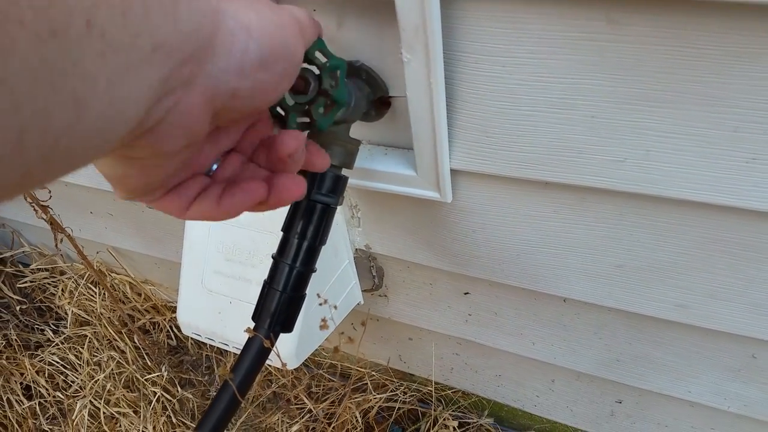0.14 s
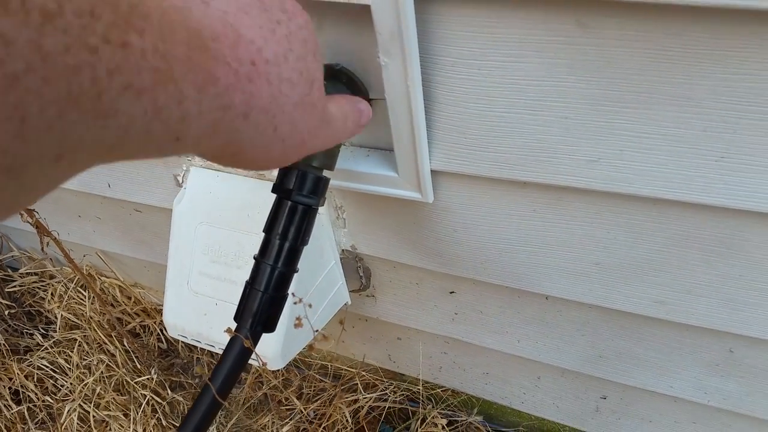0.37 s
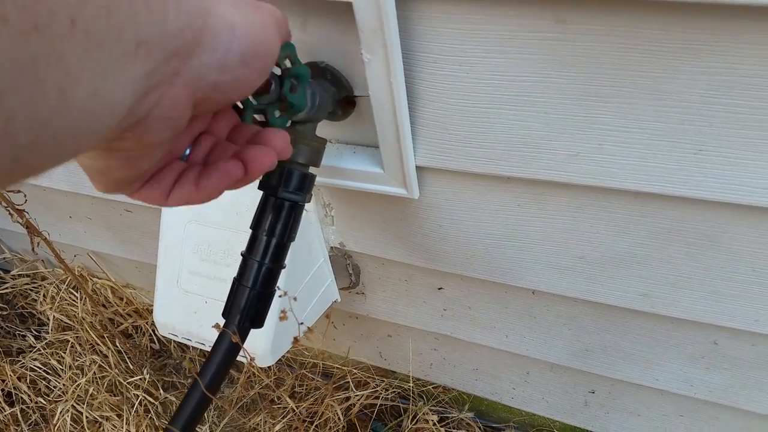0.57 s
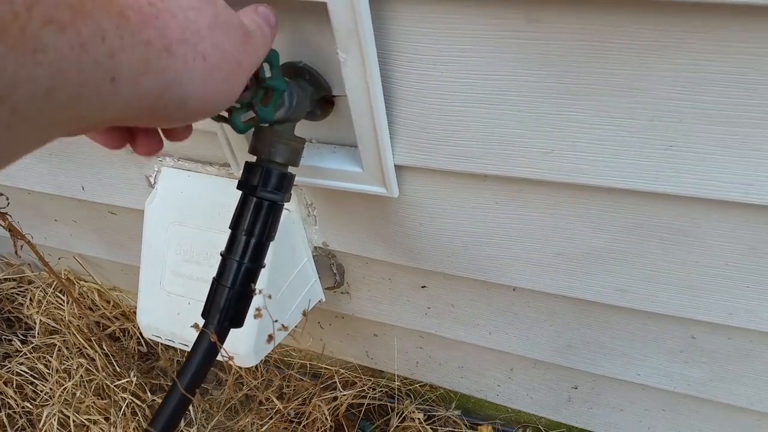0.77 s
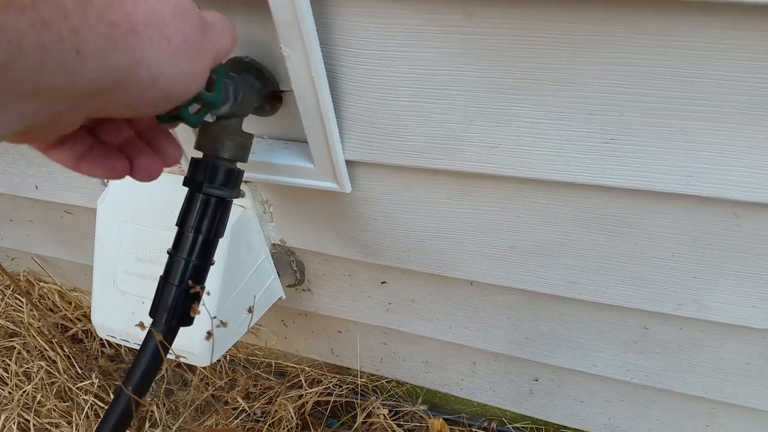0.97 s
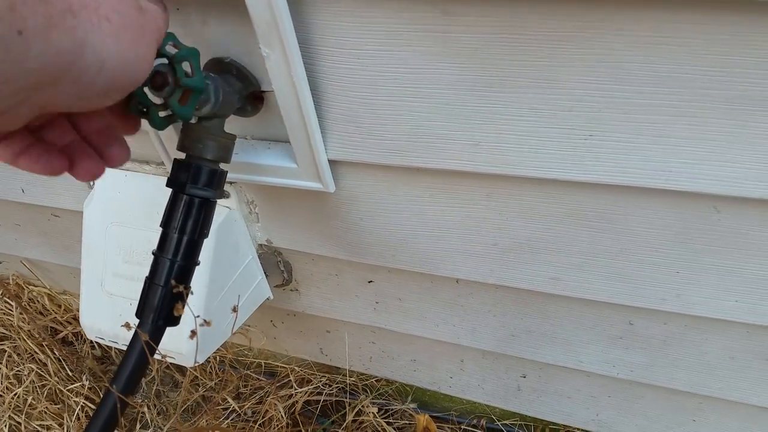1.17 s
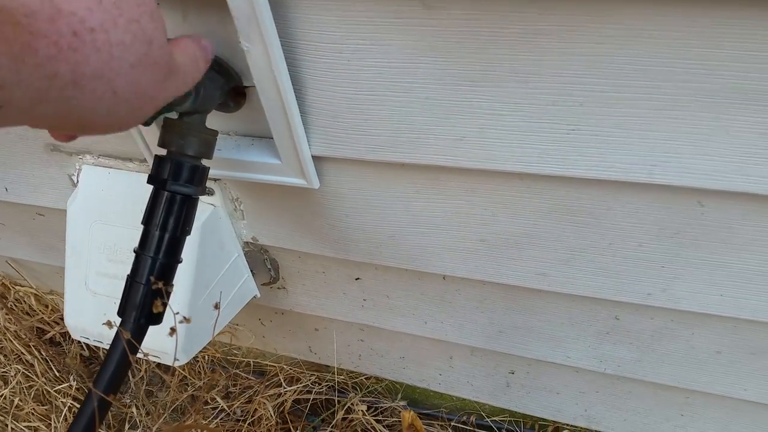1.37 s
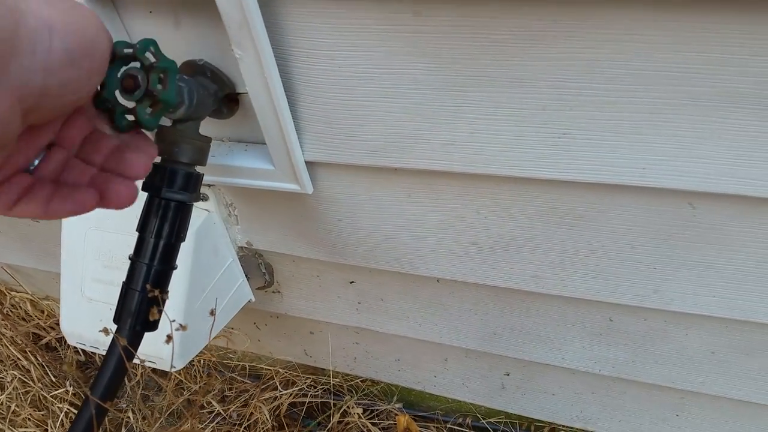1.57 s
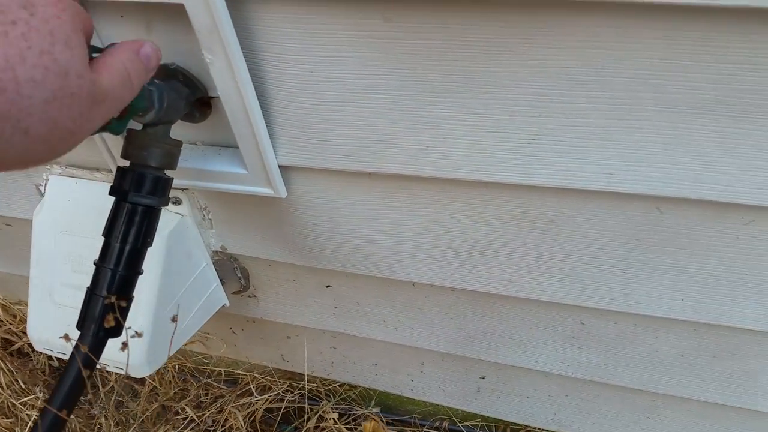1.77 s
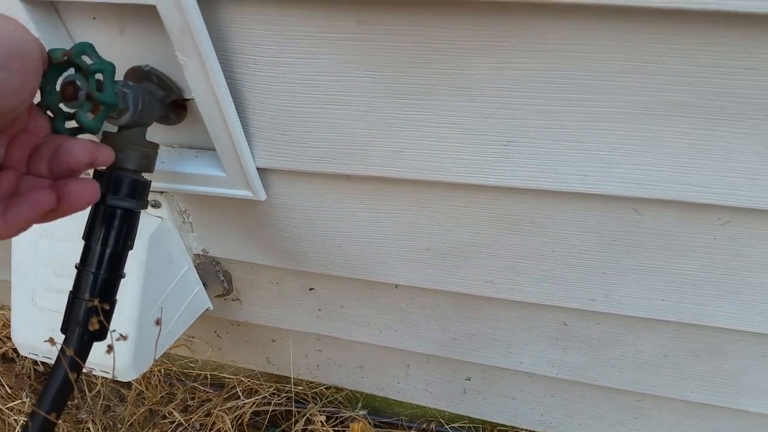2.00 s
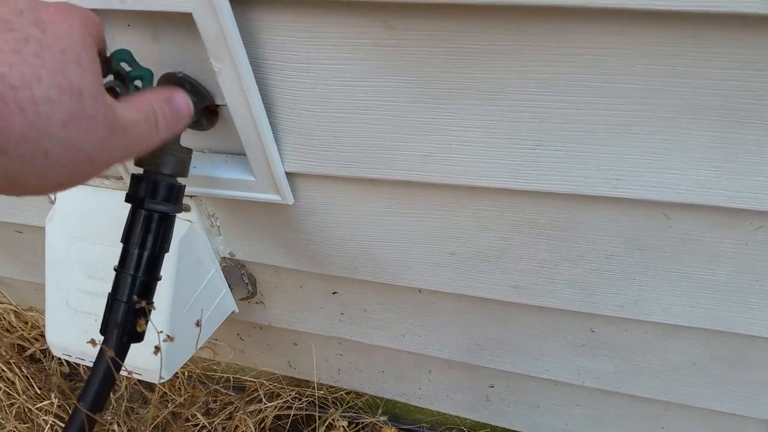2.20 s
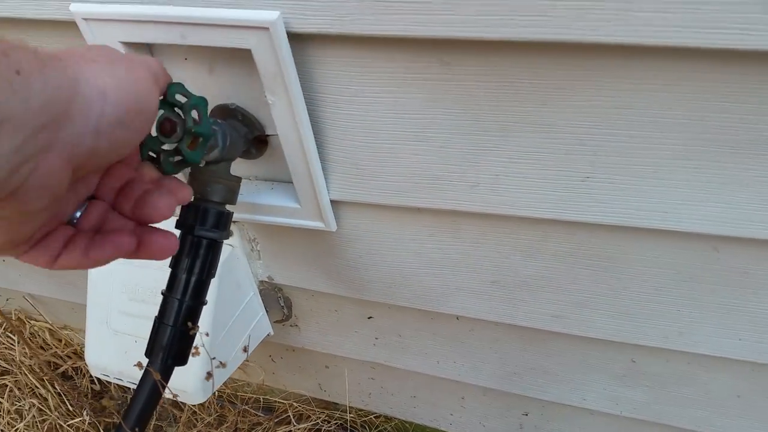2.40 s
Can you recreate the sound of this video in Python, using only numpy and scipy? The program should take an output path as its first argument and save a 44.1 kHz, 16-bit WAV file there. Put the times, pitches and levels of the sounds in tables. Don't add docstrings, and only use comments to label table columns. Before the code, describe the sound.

Dry metal tap wheel squeaking in brief high chirps, with soft grip thumps, close up outdoors

```python
import sys
import numpy as np
from scipy import signal
from scipy.fft import rfft, irfft, next_fast_len
from scipy.io import wavfile
from scipy.ndimage import map_coordinates

SR = 44100
rng = np.random.default_rng(int(sys.argv[2]) if len(sys.argv) > 2 else 0)


def makeup_ratio(level_db):
    decades = np.asarray(level_db, float) / 20
    return 10 ** decades


def wav_record(signal):
    frames = np.transpose(np.atleast_2d(signal))
    bounded = np.clip(frames, -1, 1)
    quanta = np.round(bounded * 32767).astype(np.int16)
    wavfile.write(sys.argv[1], SR, quanta)


N = 108045
T = np.arange(N) / SR

# start in seconds, hold in seconds, level in dB, pitch in Hz,
# second overtone relative to the bite in dB.
RING_SLIPS = [(.205, .005, -48, 4157, -45), (0.212, 0.016, -38, 4148, -17.5),
              (.227, 0.0082, -40.5, 4152, -33), (0.251, 0.014, -58.5, 4170, -38.5),
              (0.286, 0.0084, -45.5, 4175, -19), (0.301, 0.0118, -56.5, 4215, -44),
              (0.667, 0.012, -52, 4040, -15), (0.695, .009, -61.5, 4194, -40),
              (0.745, 0.0038, -40, 4277, -38.5), (0.768, 0.027, -55, 4160, -42),
              (0.811, 0.0097, -49, 4170, -43), (1.143, 0.023, -39.5, 4158, -21),
              (1.172, 0.027, -33, 4101, -14), (1.212, 0.0068, -49.5, 4150, -4.5),
              (1.22, 0.014, -40.5, 4090, -42), (1.244, 0.012, -48, 4060, -7),
              (1.26, 0.008, -45.5, 4080, -16), (1.615, 0.0096, -37.5, 4033, -24.5),
              (1.629, 0.0101, -43.5, 4047, -37), (1.656, .006, -46.5, 4180, -26),
              (1.665, 0.0231, -54, 4183, -29.5), (2.084, 0.014, -34.5, 4161, -5.5),
              (2.127, 0.0084, -43.5, 4106, -11.5), (2.142, 0.013, -44, 4070, -17.5)]
# from when in seconds, left-right dB of the ring,
# left-right dB of the second overtone, third overtone relative to the second in dB, left lead in radians.
HAND_TURNS = [
    (0, -16.5, -10, -13, 1.7),
    (.27, -2, -6, 4, 1.5),
    (.6, -12, -9, -12, 1.56),
    (1.1, -10, -3, -8, -2),
    (1.5, -9.5, -4, -11, -2),
    (2, -9.5, -11, -11, 2),
]
# time in seconds, pitch in Hz, level in dB.
CHIRP_GLIDES = [
    [(.26, 2598, -69), (.267, 2470, -48), (.273, 2215, -38), (.283, 2200, -40.5), (.293, 2124, -45.5),
     (.303, 2054, -54), (.313, 2026, -57), (.322, 2135, -77.5)],
    [(.722, 2946, -72.5), (.728, 2817, -57), (.734, 2532, -45.5), (.742, 2209, -39), (.753, 2200, -40.5),
     (.772, 2930, -45.5), (.785, 3120, -48), (.797, 3165, -58), (.81, 3163, -76)],
    [(2.129, 2224, -54.5), (2.138, 2103, -41), (2.146, 2015, -42.5), (2.154, 2184, -46.5),
     (2.17, 2183, -74)],
    [(.75, 2200, -49), (.759, 1940, -50), (.768, 1980, -60)],
]
# time in seconds, pitch in Hz, level in dB.
LEAD_IN_CHIRP = [(2.06, 2890, -77), (2.076, 2430, -60.5), (2.087, 2410, -65)]
CHIRP_HARMONICS_DB = [1.5, -11.5, -14.5, -31, -24, -27, -37]
CHIRP_HARSHNESS_DB = [2.5, 4, 8.5, -21]
# time in seconds, pitch in Hz, level in dB.
FAINT_LINES = [
    [(.764, 7200, -76), (.778, 7200, -64), (.793, 7320, -70.5)],
    [(.668, 3230, -72), (.679, 3110, -66), (.692, 3000, -63)],
    [(1.62, 3366, -70), (1.632, 3369, -57), (1.641, 3380, -51)],
]
# time in seconds, pitch in Hz, level in dB.
GROAN_GLIDE = [(1.624, 708.3, -58), (1.633, 706.4, -43), (1.641, 683.7, -29.5), (1.649, 635, -28),
               (1.657, 644, -32.5), (1.666, 633, -36.5), (1.675, 638, -57), (1.685, 620, -51.5),
               (1.705, 610, -47)]
GROAN_HARMONICS_DB = [1.5, -10, -19.5, -19.5, -16]
# frequency in Hz, density in dB per Hz.
GRIT_COLOUR = [(500, -55), (1200, -1), (3300, 1), (5000, -8), (6700, -4), (7900, -21), (15500, -41)]
# frequency in Hz, left-right difference in dB, left lead in radians.
PORT_DIFFERENCE = [(150, 1, 0.05), (650, 0.5, 0.85), (1400, -4, 1.8), (2200, 3.5, 1.4), (3220, -2, 2),
                   (4170, -8.5, 1.6), (5900, -20, 1.7), (10200, -3, 1.5)]
# start in seconds, length in seconds, level in dB.
HAND_CREAKS = [(0.197, 0.098, -54), (0.322, 0.0375, -50), (0.387, 0.095, -50.5), (0.518, 0.031, -57),
               (0.667, 0.13, -53), (0.883, 0.022, -54.5), (1.128, 0.068, -57), (1.199, 0.052, -51.5),
               (1.316, 0.028, -60), (1.437, 0.07, -64), (1.62, 0.064, -50.5), (1.662, 0.073, -50),
               (2.041, 0.11, -55.5), (2.12, 0.037, -44.5), (2.27, 0.011, -59)]
# frequency in Hz, density in dB per Hz.
CREAK_COLOUR = [(100, -39), (200, 4.5), (450, -3.5), (750, -2), (1300, -19.5), (2500, -25), (7000, -35),
                (12000, -47)]
# deepest swing in seconds, peak in dB, pitch in Hz.
REGRIP_THUMPS = [(0.316, -35.5, 256), (.334, -32, 230), (.349, -40, 217), (.387, -32.5, 440),
                 (0.394, -34, 500), (.404, -44, 228), (0.434, -38, 268), (.445, -33, 304), (.451, -32, 510),
                 (0.458, -42, 418), (0.523, -41.5, 190), (0.532, -40.5, 185), (.541, -37.5, 150),
                 (0.557, -42, 169), (.592, -39, 205), (0.757, -38.5, 144), (0.779, -38.5, 198),
                 (.889, -39, 348), (.897, -34, 569), (1.113, -37.5, 154), (1.169, -38.5, 250),
                 (1.187, -40.5, 278), (1.2, -33, 297), (1.207, -35.5, 231), (1.216, -37, 221),
                 (1.242, -39, 204.4), (1.444, -34.5, 245), (1.453, -34, 175), (1.493, -48.5, 245),
                 (1.503, -38.5, 210), (1.519, -36.5, 135), (1.607, -36.5, 225), (1.63, -35, 250.5),
                 (1.673, -33.5, 155), (1.687, -28, 290), (1.694, -28.5, 339), (1.703, -37, 202.5),
                 (1.712, -33, 246), (1.718, -29, 190), (1.734, -35.5, 185), (1.754, -39, 190),
                 (1.899, -41, 215), (1.906, -36, 215), (2.108, -38, 145), (2.125, -29, 290),
                 (2.134, -42, 240), (2.151, -27, 300), (2.169, -36, 129.3), (2.278, -42.5, 256.5),
                 (2.366, -43, 200)]
# start in seconds, level in dB, pitch in Hz, decay in cycles.
FINGER_TICKS = [(.06, -57, 6030, 8.6), (.469, -56.5, 2036, 15), (.484, -48, 1170, 4),
                (.492, -49, 1180, 4.9), (.536, -56, 7000, 4.5), (.575, -48, 6500, 5),
                (0.615, -45, 4430, 6.9), (1.54, -63, 5800, 18), (1.7, -51, 5400, 5.2),
                (1.714, -57, 4730, 5.9), (1.727, -68, 4600, 4), (1.739, -68, 6620, 40),
                (1.751, -40.5, 970, 2.5), (2.272, -50, 793, 2.02)]
# start in seconds, length in seconds, level in dB.
SKIN_RUBS = [
    (0, 0.031, -63),
    (0.334, 0.2, -72.5),
    (0.512, 0.11, -61),
    (0.616, 0.049, -65.5),
    (0.935, 0.11, -72.5),
    (1.54, 0.018, -68),
    (2.353, 0.035, -70.5),
]
# frequency in Hz, density in dB per Hz.
RUB_COLOUR = [(900, -22), (2000, -4), (6500, -3), (8400, -12), (15600, -8.5)]
# frequency in Hz, density in dB per Hz.
TRAFFIC_COLOUR = [(20, -29), (42, -19), (55, 2), (130, -1), (260, -6), (400, -14.5), (520, -57.5),
                  (900, -97)]
# frequency in Hz, density in dB per Hz.
AIR_COLOUR = [(250, -25.5), (480, -7.5), (900, -10.5), (2000, -19), (4000, -24), (8000, -28.5),
              (12000, -25.5), (15700, -27.5)]
# frequency in Hz, left-right likeness from 0 to 1.
PORT_LIKENESS = [(100, 0.97), (290, .92), (640, 0.36), (1400, 0)]


def unit(x):
    return x / np.sqrt(np.mean(x ** 2) + 1e-20)


def along(points, hz, column=1):
    p = np.transpose(points)
    return np.interp(np.log(hz + 1), np.log(p[0] + 1), p[column])


def wobble(rate, t=T):
    knots = rng.standard_normal(int(N * rate / SR) + 4)
    return map_coordinates(knots, [t * rate])


def filtered(x, response):
    m = next_fast_len(N + 8192)
    return irfft(rfft(x, m) * response(np.fft.rfftfreq(m, 1 / SR)), m)[..., :N]


def noise(spectrum, channels=1):
    white = rng.standard_normal((channels, N))
    return unit(filtered(white, lambda hz: makeup_ratio(along(spectrum, hz))))


def swell(t, s, hold, rise_db_s, t60):
    rise = rise_db_s * (t - s)
    fall = -60 * (t - s - hold) / t60
    return np.minimum(0, np.minimum(rise, fall))


def split(side_db, lead):
    ratio = makeup_ratio(side_db) * np.exp(1j * lead)
    return np.array([2 * ratio / (1 + ratio), 2 / (1 + ratio)])


def ports(x):
    return filtered(x, lambda hz: split(along(PORT_DIFFERENCE, hz), along(PORT_DIFFERENCE, hz, column=2)))


def ring():
    rise_db_s, build_db_s = 3397, 68
    wheel_t60_s, bite_t60_s = 0.0426, 0.02
    out, grit = np.zeros((2, N)), np.zeros(N)
    s, hold, _, hz, _ = np.transpose(RING_SLIPS)
    pitch = np.interp(T, s + hold / 2, hz) * (1 + 0.00254 * wobble(300))
    turning = np.exp(2j * np.pi * np.cumsum(pitch) / SR)
    first, second, third = [np.sqrt(2) * makeup_ratio(depth_db * wobble(110)) * turning ** k
                            for k, depth_db in ((1, 1.3), (2, 2.5), (3, 3.5))]
    for s, hold, db, _, bite_db in RING_SLIPS:
        _, side_db, second_side_db, third_db, lead = [turn for turn in HAND_TURNS if turn[0] <= s][-1]
        near = slice(round(s * SR) - SR // 20, round(s * SR) + SR // 8)
        t = T[near]
        db = db + build_db_s * np.clip(t - s - hold, -hold, 0)
        slip = np.exp(2j * np.pi * rng.random())
        wheel = slip * makeup_ratio(db + swell(t, s, hold, rise_db_s, wheel_t60_s))
        bite = slip * makeup_ratio(db + swell(t, s, hold, 1.6 * rise_db_s, bite_t60_s))
        out[:, near] += (split(side_db, lead)[:, None] * wheel * first[near]).real
        out[:, near] += (split(second_side_db, 1.77)[:, None] * makeup_ratio(bite_db) * bite * second[near]).real
        out[:, near] += (split(0.87, 1.6)[:, None] * makeup_ratio(bite_db + third_db) * bite * third[near]).real
        grit[near] += abs(bite)
    return out + ports(makeup_ratio(-28 + 1.0 * wobble(200)) * grit * noise(GRIT_COLOUR)[0])


def track(rows, jitter):
    s, hz, db = np.transpose(rows)
    t = T[round(s[0] * SR):round(s[-1] * SR)]
    pitch = np.interp(t, s, hz)
    phase = 2 * np.pi * np.cumsum(pitch * (1 + jitter * wobble(500, t))) / SR
    faster = np.maximum(1, pitch / hz[db.argmax()])
    return t, phase, np.interp(t, s, db), faster


def squeal(rows, overtones_db, bite_db, jitter, rough_db, grows, grit_db, burst_db, grit):
    t, phase, level_db, faster = track(rows, jitter)
    under_db = level_db - level_db.max()
    level_db = level_db + burst_db * wobble(380, t)
    scatter_hz = rows[0][1] / 4
    tone = np.zeros(len(t))
    for k, db in enumerate(overtones_db):
        speed_dulls_db = 15 * k * (faster - 1)
        db = db + (k > 0) * bite_db + k * (grows * under_db - speed_dulls_db)
        size = makeup_ratio(level_db + db + rough_db * wobble(scatter_hz, t))
        timing = 0.44 * (k + 1) ** 0.5 * wobble(scatter_hz, t)
        tone += size * np.sin((k + 1) * phase + k + timing)
    here = slice(round(t[0] * SR), round(t[0] * SR) + len(t))
    pulses = (1 + np.cos(phase)) ** 2
    out = np.zeros(N)
    out[here] = np.sqrt(2) * tone + makeup_ratio(level_db + grit_db + bite_db + under_db) * pulses * grit[here]
    return out


def chirps():
    grit = noise(GRIT_COLOUR)[0]
    out = np.zeros(N)
    for rows, bite_db in zip(CHIRP_GLIDES, CHIRP_HARSHNESS_DB):
        out += squeal(rows, CHIRP_HARMONICS_DB, bite_db, jitter=0.007, rough_db=2.0, grows=0.085,
                      grit_db=-22.5, burst_db=2.0, grit=grit)
    out += squeal(LEAD_IN_CHIRP, [0], 0, jitter=0.057, rough_db=6.5, grows=0,
                  grit_db=-4.0, burst_db=1.0, grit=grit)
    for rows in FAINT_LINES:
        out += squeal(rows, [0], 0, jitter=0.013, rough_db=2.5, grows=0,
                      grit_db=-18, burst_db=-0.5, grit=grit)
    out += squeal(GROAN_GLIDE, GROAN_HARMONICS_DB, 0, jitter=0.019, rough_db=3.1, grows=0.23,
                  grit_db=-18, burst_db=0.05, grit=grit)
    return ports(out)


def wall(x):
    t = T[:SR // 4]
    tail = rng.standard_normal((2, len(t))) * makeup_ratio(-60 * t / 0.2)
    wet = signal.fftconvolve(x, tail / np.linalg.norm(tail[0]), axes=1)[:, :N]
    return filtered(wet, lambda hz: 1 / (1 + (hz / 5500) ** 4))


def knocks(rows, attack_s):
    out, t = np.zeros(N + SR), T[:SR // 10]
    for s, db, hz, cycles in rows:
        shape = np.exp(-t * hz / cycles) * (1 - np.exp(-t / attack_s))
        out[round(s * SR):][:len(t)] -= makeup_ratio(db) * np.sin(2 * np.pi * hz * t) * shape
    return out[:N]


def hand():
    slips = (rng.random(N) < 700 / SR) * rng.standard_normal(N)
    slips = slips * makeup_ratio(1.23 * wobble(39.58)) + 0.11 * rng.standard_normal(N)
    creak = unit(filtered(slips, lambda hz: makeup_ratio(along(CREAK_COLOUR, hz))))
    effort = sum(makeup_ratio(db + swell(T, s, d, rise_db_s=910, t60=0.1)) for s, d, db in HAND_CREAKS)
    swings = [(s - 1 / (4 * hz), db + 6.0, hz, 0.61) for s, db, hz in REGRIP_THUMPS]
    thumps = knocks(swings, attack_s=0.00092)
    ticks = knocks(FINGER_TICKS, attack_s=0.0001)
    return ports(effort * creak + thumps + ticks)


def rubs():
    shape = np.zeros(N)
    for s, d, db in SKIN_RUBS:
        shape += makeup_ratio(db) * np.clip((T - s) / 0.0017, 0, 1) * np.clip((s + d - T) / 0.021, 0, 1)
    near, wide = shape * makeup_ratio(0.36 * wobble(120)) * noise(RUB_COLOUR, channels=2)
    return ports(near) + 0.5 * wide * np.array([[1], [-1]]) * makeup_ratio(-20)


def spread(spectrum):
    def mid_side(hz):
        angle = np.arccos(np.clip(along(PORT_LIKENESS, hz), -1, 1)) / 2
        return np.array([np.cos(angle), np.sin(angle)])
    mid, side = filtered(noise(spectrum, channels=2), mid_side)
    return np.array([mid + side, mid - side])


def outdoors():
    traffic = makeup_ratio(-50 + 1.7 * wobble(6.08)) * spread(TRAFFIC_COLOUR)
    air = makeup_ratio(-66.5 + 0.5 + 1.5 * wobble(1.53)) * spread(AIR_COLOUR)
    hum_phase = 2 * np.pi * 57 * T + 0.53 * wobble(5.1)
    hum = makeup_ratio(-63.5 + 2.3 * wobble(15.0)) * np.sqrt(2) * np.sin(hum_phase)
    return traffic + air + hum


def scene():
    tap = ring() + chirps()
    return tap + makeup_ratio(-17.5) * wall(tap) + hand() + rubs() + outdoors()


def low_pass(x):
    return signal.sosfilt(signal.butter(12, 15700, fs=SR, output="sos"), x)


def record(dry):
    mix = filtered(dry, lambda hz: hz < 15750)
    return low_pass(mix)


dry = scene()
out = record(dry)
wav_record(out)
```